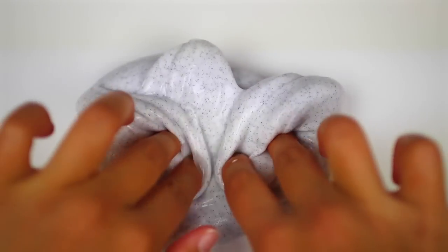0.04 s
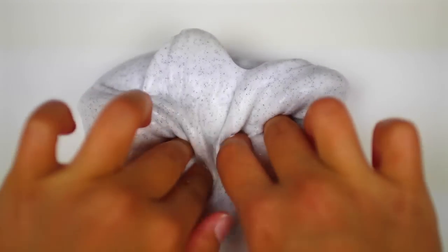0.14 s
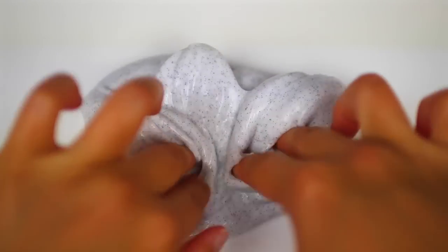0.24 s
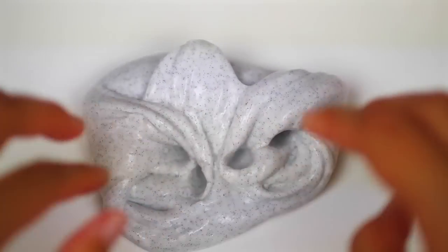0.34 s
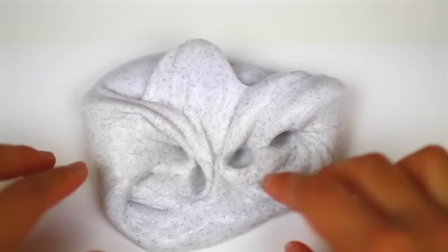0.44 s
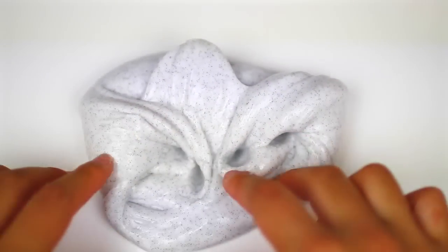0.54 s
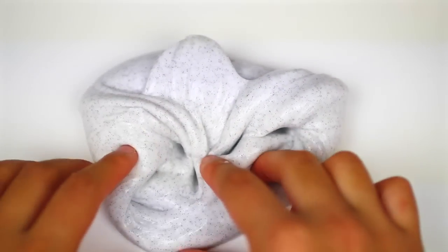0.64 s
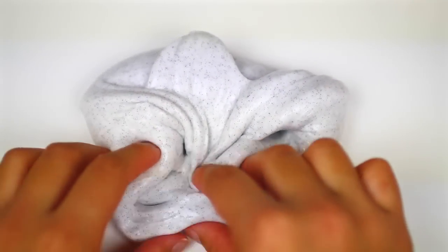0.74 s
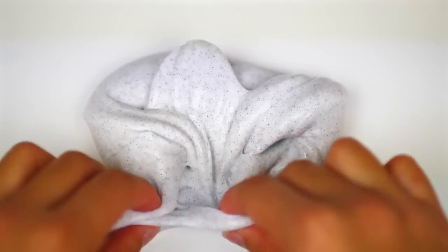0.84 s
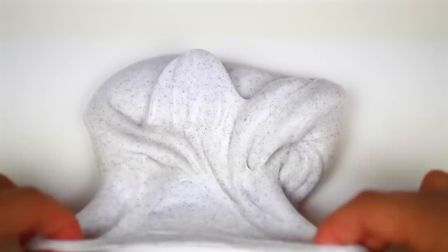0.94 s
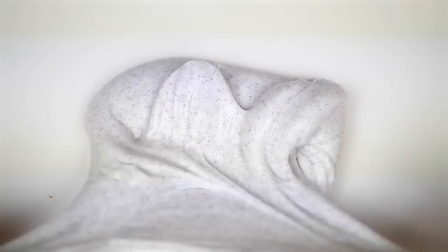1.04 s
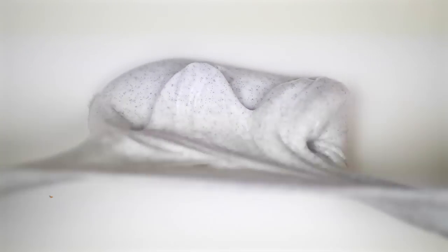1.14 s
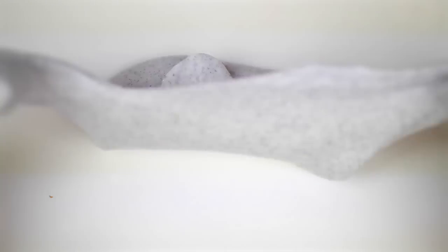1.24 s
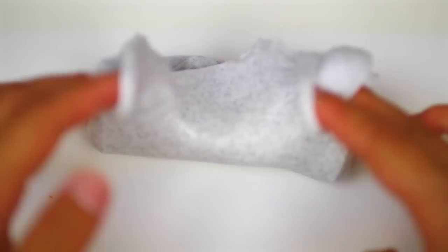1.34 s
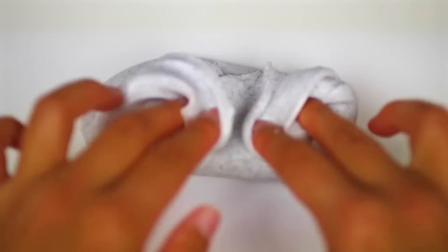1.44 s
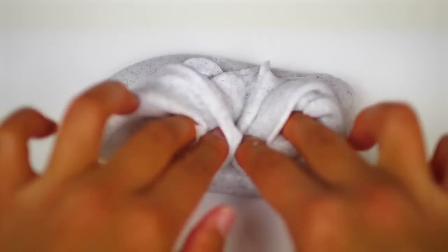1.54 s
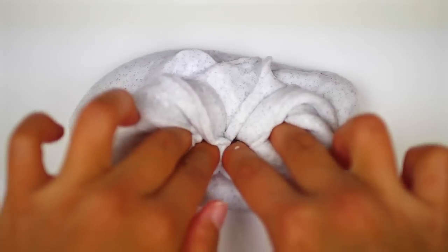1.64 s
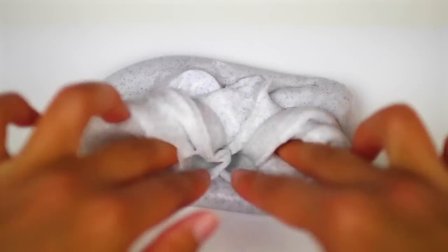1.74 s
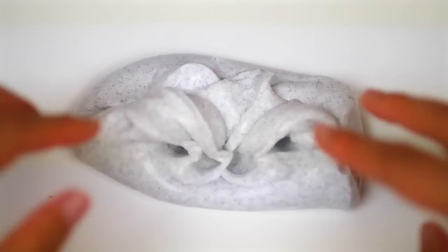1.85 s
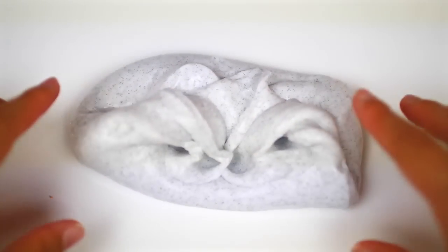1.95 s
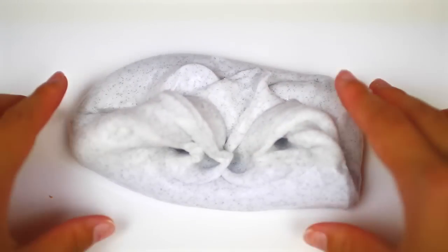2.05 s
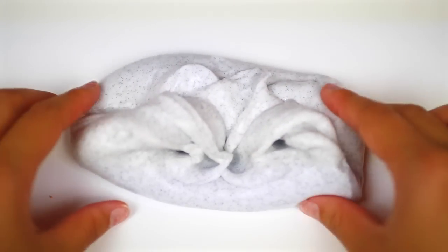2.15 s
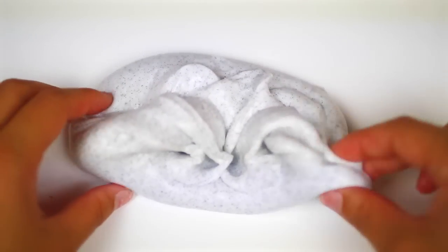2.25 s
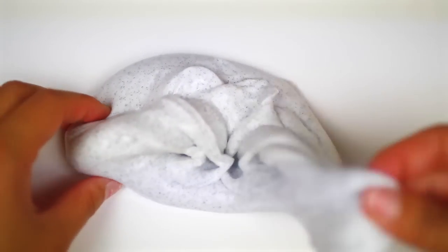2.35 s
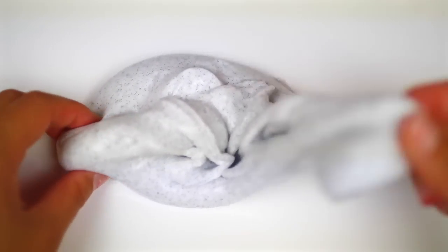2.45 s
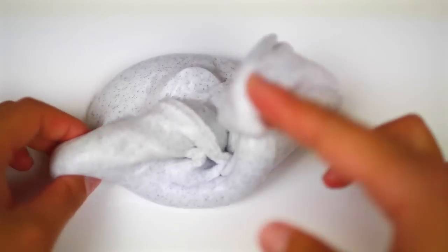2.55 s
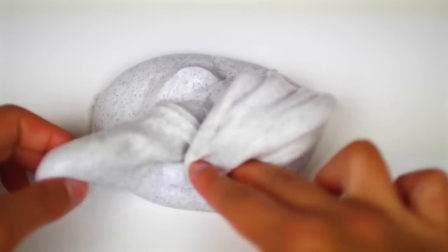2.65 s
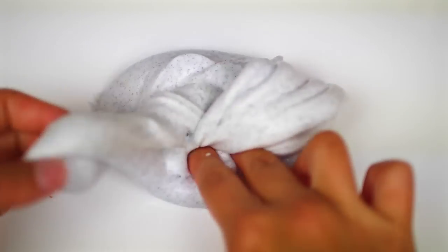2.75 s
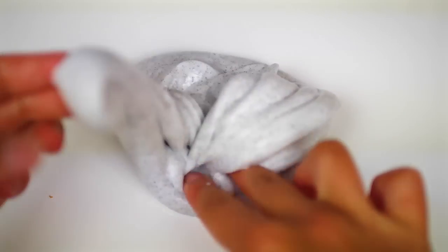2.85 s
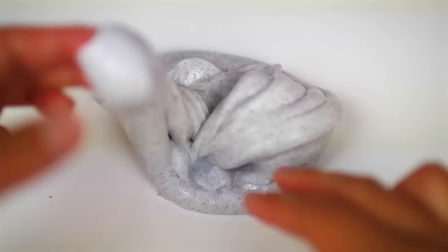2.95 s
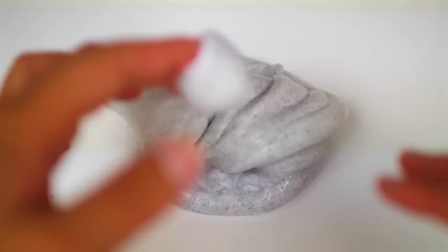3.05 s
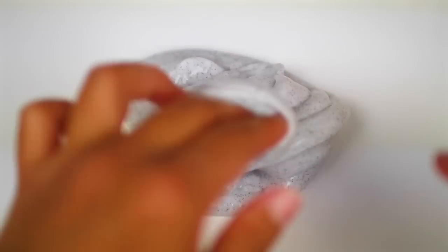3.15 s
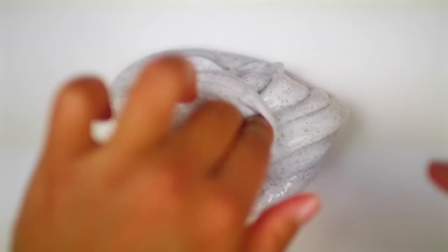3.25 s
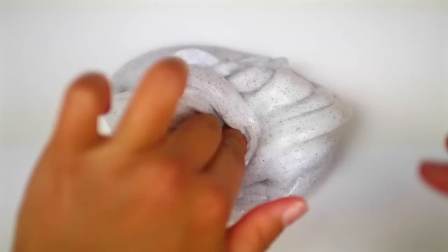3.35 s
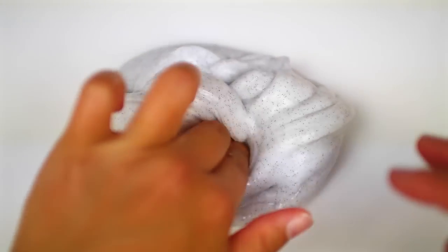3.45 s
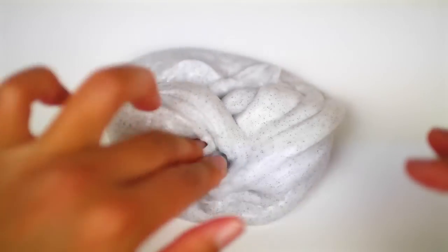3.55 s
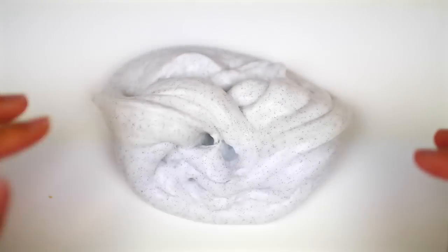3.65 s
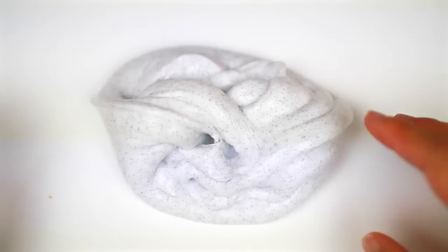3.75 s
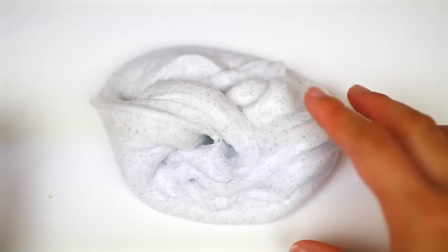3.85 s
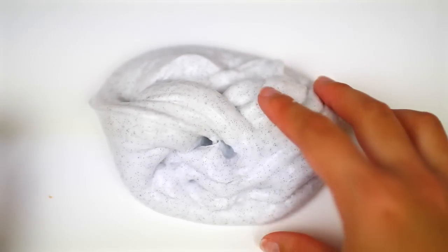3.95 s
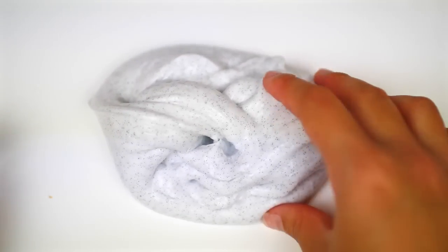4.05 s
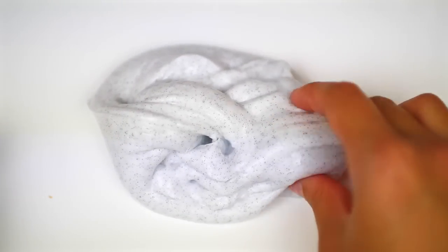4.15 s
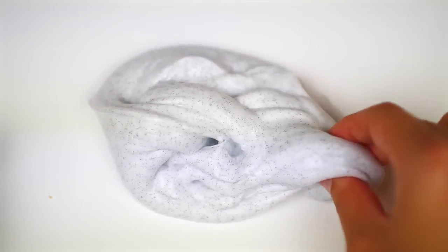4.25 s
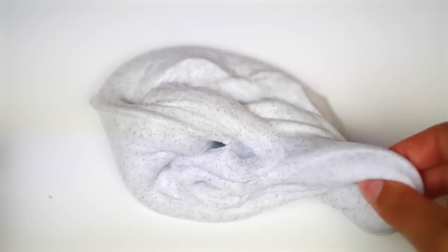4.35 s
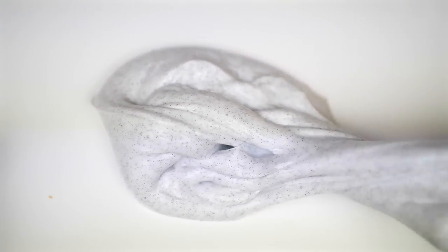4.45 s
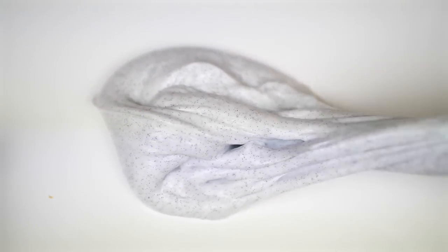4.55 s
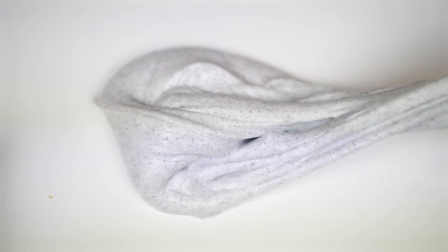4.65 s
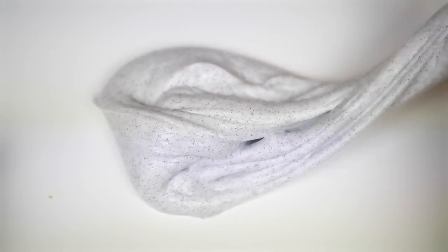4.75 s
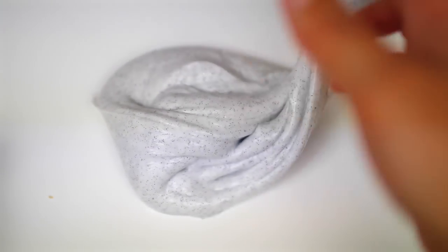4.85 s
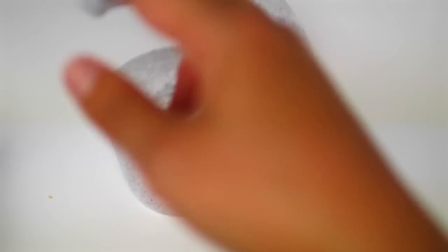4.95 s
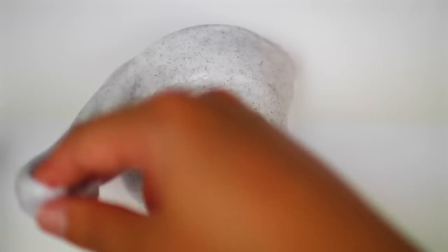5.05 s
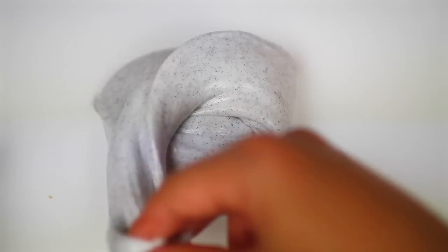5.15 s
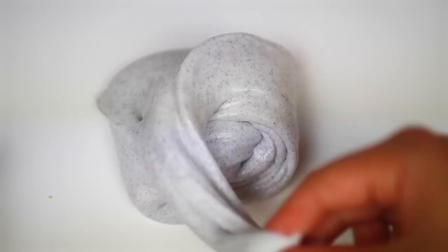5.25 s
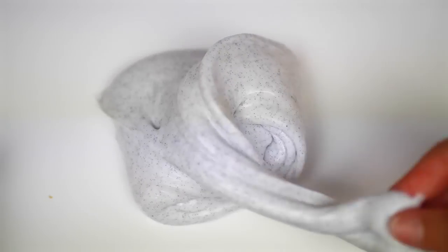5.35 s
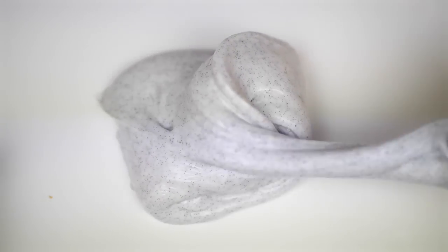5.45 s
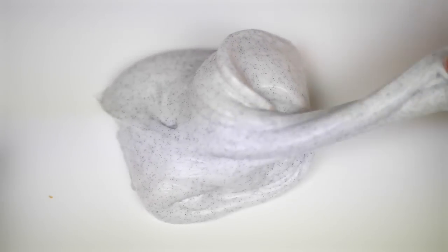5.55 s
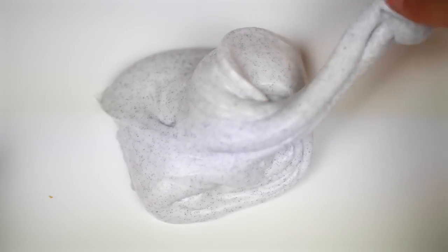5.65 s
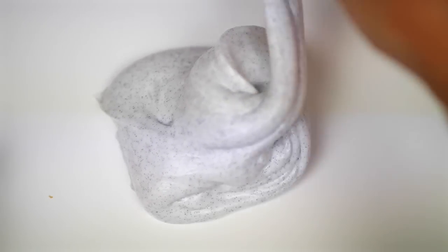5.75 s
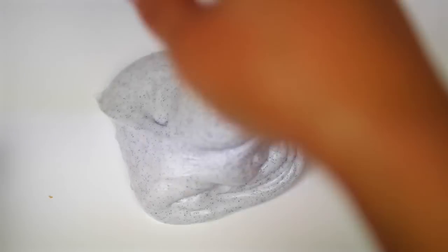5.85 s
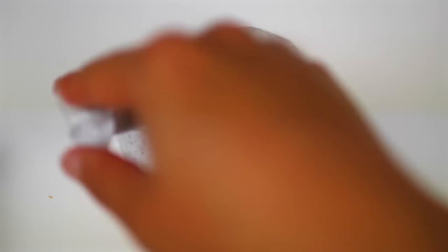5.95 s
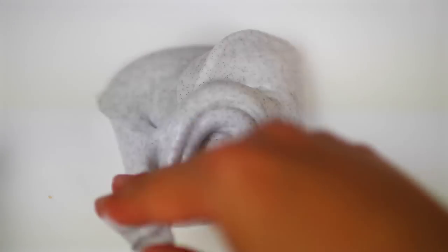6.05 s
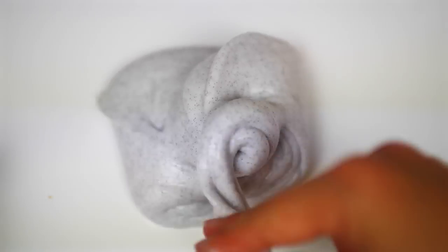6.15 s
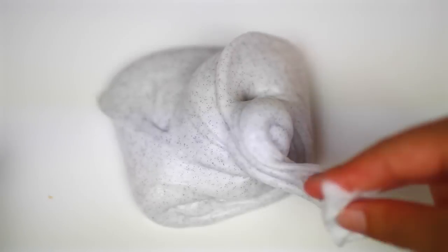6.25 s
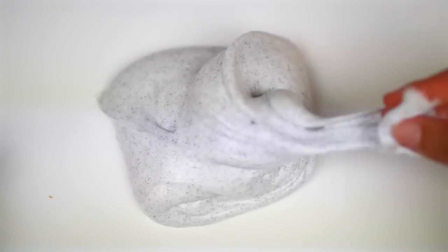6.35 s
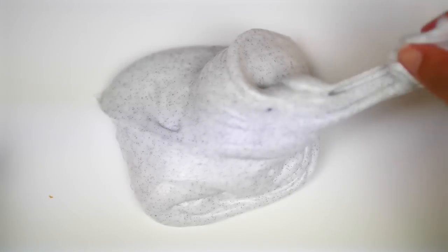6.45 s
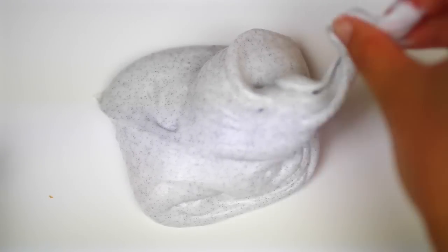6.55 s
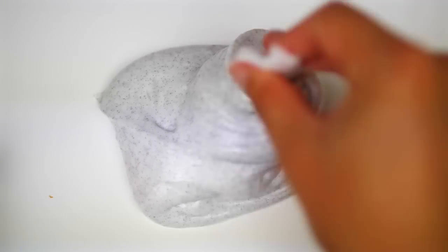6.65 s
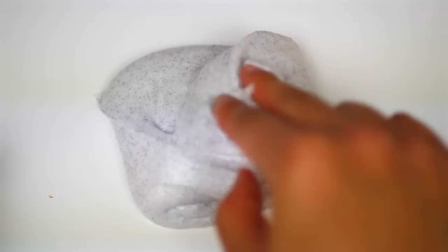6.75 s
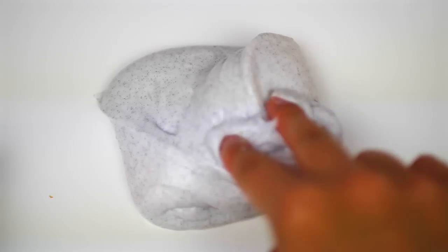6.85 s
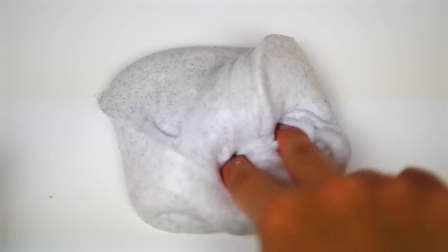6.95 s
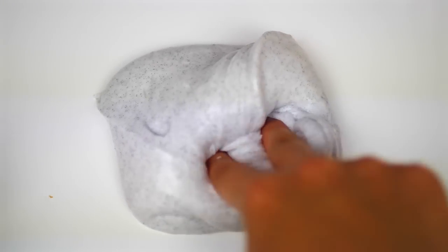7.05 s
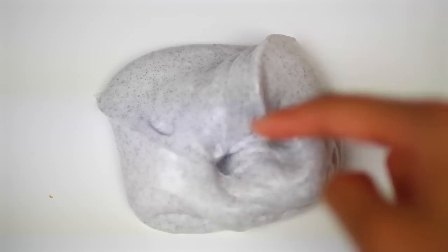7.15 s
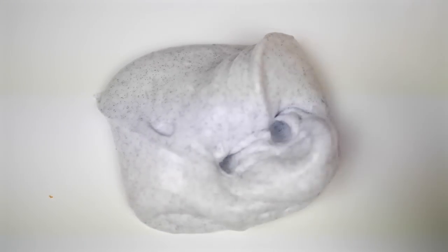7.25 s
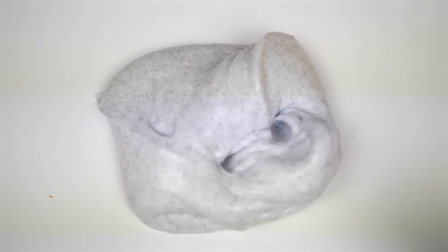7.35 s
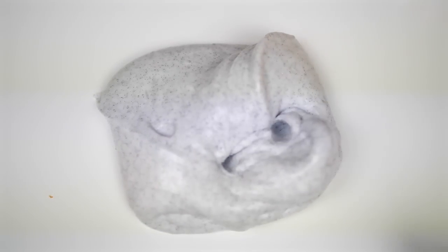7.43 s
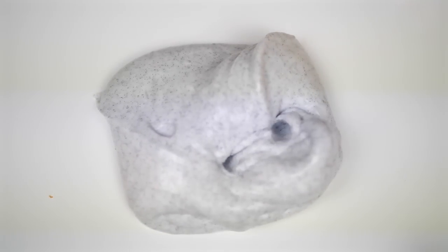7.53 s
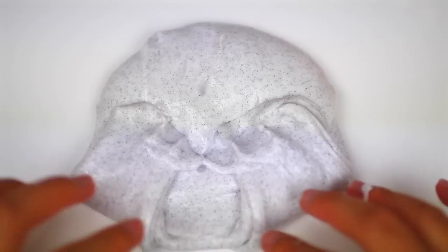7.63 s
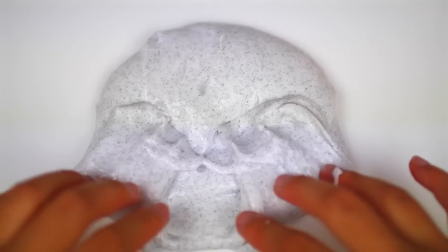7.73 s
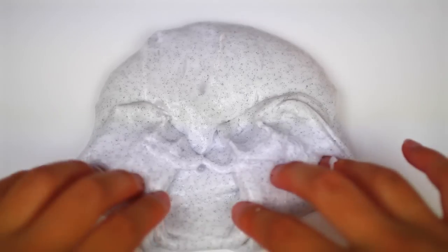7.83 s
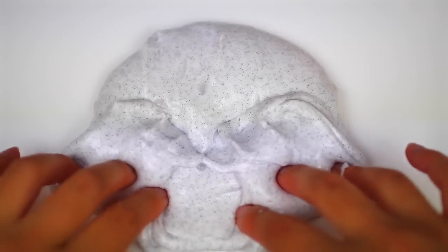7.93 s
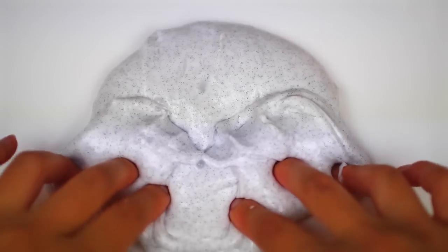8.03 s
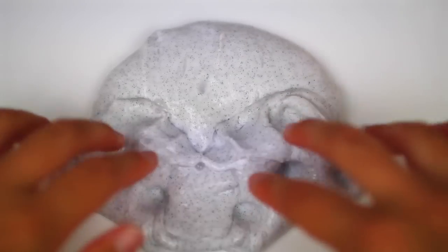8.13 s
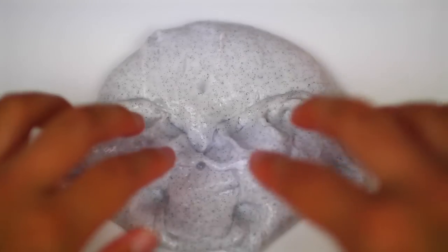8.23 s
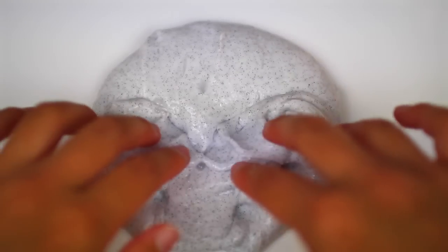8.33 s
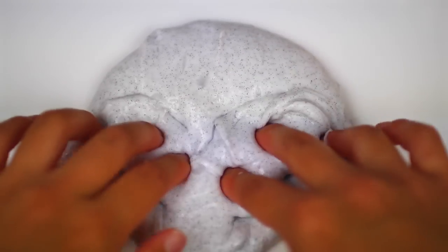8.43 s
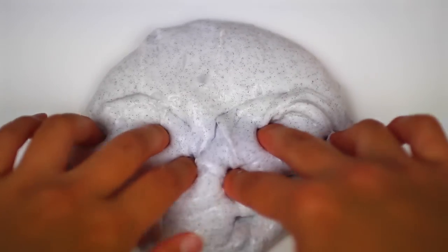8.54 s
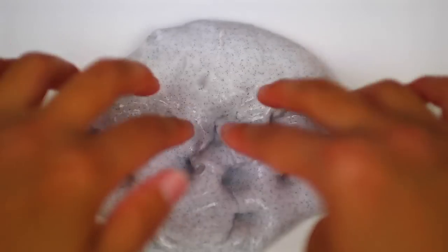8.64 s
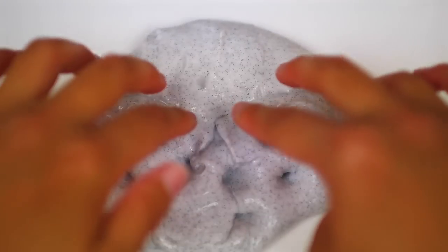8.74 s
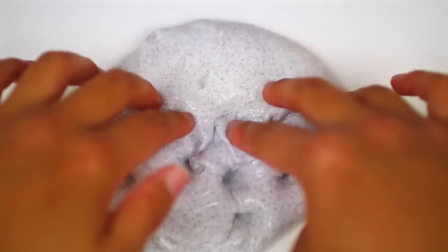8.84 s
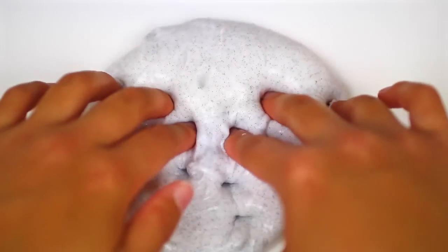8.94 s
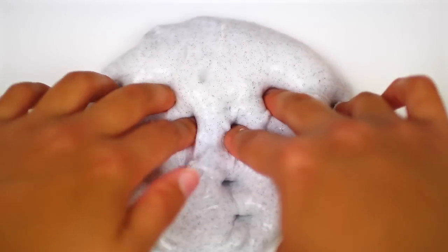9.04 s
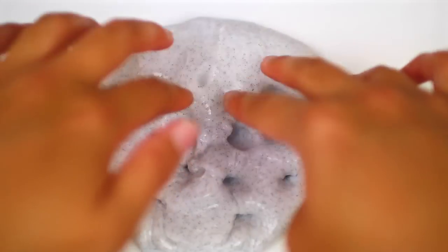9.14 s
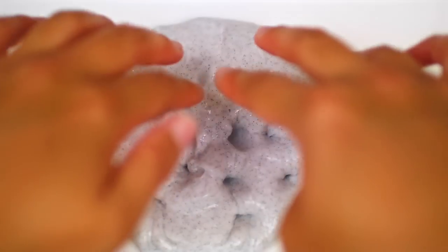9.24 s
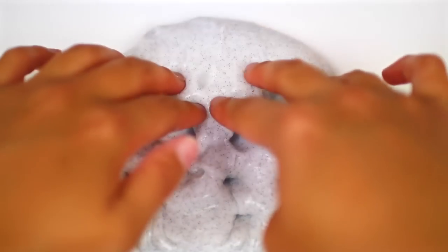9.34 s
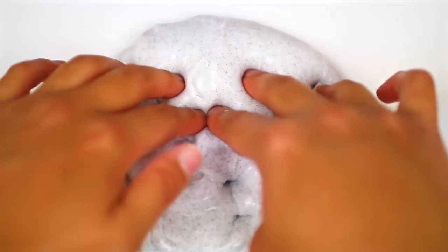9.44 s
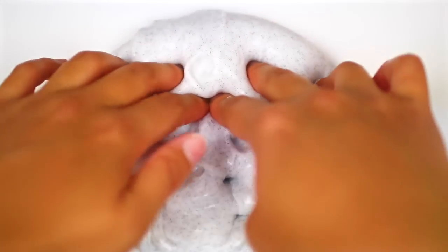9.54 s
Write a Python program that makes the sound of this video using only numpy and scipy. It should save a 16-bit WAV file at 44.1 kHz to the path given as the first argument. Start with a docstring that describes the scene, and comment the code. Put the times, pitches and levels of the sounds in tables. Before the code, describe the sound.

Sharp, dry clicking pops of trapped air tearing through slime skin, each a tight burst of two to four cracks with a hollow, bottle-like plop and a soft thud. Between them come sticky finger ticks, fine foam crackle and quiet stuttering motor chirps. Close mono microphone, small room with short reflections, gentle rumble, hiss and fan drone.

```python
"""In a small room, hands fold, stretch and press a lump of slime on a table, close to one microphone.
Trapped air bursts out in clusters: the skin tears in noisy slips and the opened pocket rings with a hollow plop.
Small impulses make the faint crackle and the ticks of slime leaving the fingers; damped sines make soft thuds.
A lens motor chirps as its steps brake, over rumble, hiss and a soft fan of filtered noise.
Resonances of the table top, near echoes and a diffuse field answer the sources."""
import sys
import numpy as np
from scipy import signal
from scipy.fft import rfft, irfft
from scipy.io import wavfile

SR = 44100
rng = np.random.default_rng(int(sys.argv[2]) if len(sys.argv) > 2 else 0)


def pcm_store(signal):
    """Save signal as 16-bit PCM."""
    levels = np.round(np.clip(np.atleast_2d(signal), -1, 1) * 32767)
    wavfile.write(sys.argv[1], SR, levels.astype(np.int16).T)


N = 422919  # samples

# air pockets bursting, levels before the common gains: t/s, crack level/dB, tear length/s,
# hole f/Hz, hole ring level/dB, pocket f/Hz, plop level/dB
BURSTS = [ (0.2992, -24, 0.0083, 5800, -14.5, 900, -44), (.304, -20, 0.0041, 3000, -6.5, 890, -40.5),
          (0.3268, 0.5, .0012, 2900, -2.5, 442, -9), (0.3306, 7, 0.00063, 7000, 1.5, 690, -12.5),
          (.355, -17, 0.0025, 4000, -21, 380, -21.5), (1.794, -8.5, 0.0015, 3600, -8.5, 1500, -31),
          (1.8343, -8.5, .002, 4400, -3.5, 1100, -32), (1.8394, 0.5, 0.0022, 4770, -2, 534, -5),
          (2.958, 1, 0.00032, 13500, -12, 900, -35), (2.9617, -10, 0.0004, 3300, -4.5, 650, -31),
          (2.97, -15, .0025, 3000, -16.5, 570, -13.5), (3.6196, -16, 0.002, 3300, -17.5, 1000, -21.5),
          (3.6376, -7, 0.0014, 2630, -13, 1090, -25), (3.6465, -14, 0.0011, 3750, -3.5, 440, -29.5),
          (7.1906, -4, 0.0018, 3460, -3.5, 533, -16), (7.2111, -19, 0.00053, 3410, -2, 382, -20),
          (8.1647, -1.5, 0.0014, 5000, -11.5, 1230, -27), (8.169, 2, 0.00071, 11500, -2, 675, -11.5),
          (8.184, 4, 0.00095, 1350, -2, 635, -3), (8.6568, 0.5, 0.0015, 2650, -12, 1070, -14),
          (8.6696, 1.5, 0.0012, 3500, -9, 675, -11.5), (8.681, -1, 0.0015, 1520, -12.5, 790, -13.5),
          (8.689, -8, 0.00051, 1530, -15, 980, -11), (9.166, 1, 0.00085, 2650, -13, 970, -10),
          (9.1748, -7, 0.0015, 3500, -11, 780, -9.5), (9.1847, -0.5, 0.0019, 3120, -11, 594, -8.5)]
# spectrum of cracking slime skin, relative: f/Hz, level/dB
CRACK_SPECTRUM = [(60, -18), (300, -8.5), (800, 1.5), (1700, -5.5), (3200, 2.5), (5000, -0.5), (8000, 2),
                  (12000, -2.5), (16000, -5.5)]
REST_DB = -75.5  # crackle of the lump settling between pulls, before the crackle gain


def from_db(db):
    """Level to amplitude: 20 dB is a factor of ten."""
    return 10 ** (np.asarray(db) / 20)


def rms_one(x):
    """Normalisation to unit effective value."""
    return x / np.sqrt(np.mean(x ** 2) + 1e-20)


def seconds(length):
    """Sampled time axis of the given length in seconds."""
    return np.arange(int(length * SR)) / SR


def at_hz(points, hz, axis=1):
    """Interpolation of one table column on a logarithmic frequency axis."""
    rows = np.array(points)
    return np.interp(np.log(np.maximum(hz, 1)), np.log(rows[:, 0]), rows[:, axis])


def add(out, s, sound):
    """Superposition: mixes a sound in from time s."""
    start = max(int(s * SR), 0)
    out[start:start + len(sound)] += sound[:max(N - start, 0)]


def colour(x, spectrum):
    """Minimum-phase filtering by the folded cepstrum: causal, with unit power gain."""
    size = 2 ** 13
    hz = np.arange(size // 2 + 1) * SR / size
    gain = rms_one(from_db(at_hz(spectrum, hz)))
    cepstrum = irfft(np.log(gain))
    cepstrum[1:size // 2] *= 2
    cepstrum[size // 2 + 1:] = 0
    impulse_response = irfft(np.exp(rfft(cepstrum)))
    return signal.fftconvolve(x, impulse_response)[:len(x)]


def resonate(x, hz, width_hz):
    """Damped oscillator: one pole pair whose radius sets the bandwidth, gain 1 at the peak."""
    r = np.exp(-np.pi * width_hz / SR)
    w = 2 * np.pi * min(hz, SR / 2 - 1) / SR
    return signal.lfilter(np.array([1, 0, -1]) * (1 - r * r) / 2, [1, -2 * r * np.cos(w), r * r], x)


def smooth(x, time_s):
    """First-order relaxation: a running average with the given time constant."""
    r = np.exp(-1 / (time_s * SR))
    return signal.lfilter([1 - r], [1, -r], x)


def rip(length, grain_db, snap):
    """Stick-slip: a first snap and a dying run of uneven slips, with the energy of a fading unit sine."""
    t = seconds(.04)
    slips = rng.standard_normal(len(t)) * from_db(grain_db * rng.standard_normal(len(t)))
    rise = 1 - np.exp(-4 * t / length)
    decay = np.exp(-t / length - (t / (3 * length)) ** 2)
    run = rms_one(slips) * decay * rise
    run[0] += snap
    return rms_one(run) * np.sqrt(np.mean(np.exp(-2 * t / length)) / 2)


def hole_ring(burst, hz, sharpness):
    """Resonance of a small opening: the burst excites its pitch, at the burst's own energy."""
    return rms_one(resonate(burst, hz, hz / sharpness)) * np.std(burst)


def tears(crack_db=-2.5, ring_db=-4.0):
    """Brittle failure of a membrane: the skin cracks and its hole rings."""
    lead_s, lead_db = .004, -27.5  # faint noise before the crack: length, level
    cracks, rings = np.zeros(N), np.zeros(N)
    for s, level_db, length, hz, whistle_db, _, _ in BURSTS:
        burst = rip(length, grain_db=3.5, snap=1.2)
        add(cracks, s, from_db(level_db) * burst)
        lead = rip(lead_s, grain_db=3.5, snap=0) * np.sqrt(length / lead_s)
        add(cracks, s - 2 * lead_s, from_db(level_db + lead_db) * lead)
        add(rings, s, from_db(whistle_db) * hole_ring(burst, hz, sharpness=6.5))
    return from_db(crack_db) * colour(cracks, CRACK_SPECTRUM) + from_db(ring_db) * rings


def pockets(bend=0.13, settle_s=0.0017, open_s=0.0004, puff_db=-30.5, puff_s=0.0039,
            flap_db=-4.5, flap_s=0.0036, flap_ratio=1.206):
    """Cavity resonance: the opened pocket rings like a tiny bottle, its pitch settling as air puffs out."""
    cycles_to_60_db = 10  # cycles of ringing until 60 dB down
    lag = 1.2  # opening delay in tear lengths
    out, t = np.zeros(N), seconds(.15)
    for torn_s, _, length, _, _, hz, level_db in BURSTS:
        s = torn_s + lag * length
        t60 = cycles_to_60_db / hz
        pitch = hz * (1 + bend * np.exp(-t / settle_s))
        ring = np.sin(2 * np.pi * np.cumsum(pitch) / SR) * from_db(-60 * t / t60)
        puff = from_db(puff_db) * np.exp(-t / puff_s)
        add(out, s, from_db(level_db) * (ring + puff) * (1 - np.exp(-t / open_s)))
        # the rim flaps unevenly, which roughens the plop and widens its spectrum
        flap_hz = hz * flap_ratio
        flap = hole_ring(rip(flap_s, grain_db=3.5, snap=0), flap_hz, sharpness=0.31)
        add(out, s, from_db(level_db + flap_db) * hole_ring(flap, flap_hz, sharpness=0.98))
    return signal.sosfilt(signal.butter(2, 40, "high", fs=SR, output="sos"), out)


def thuds(fade_s=0.0065):
    """Heavily damped impact: the emptied lump drops onto the table as a short decaying sine."""
    # lump slumping after a burst: t/s, level/dB, f/Hz
    thud_table = [(0.332, -28.5, 130.4), (1.844, -30, 219), (2.968, -38, 167), (3.646, -33.5, 200),
                  (7.194, -27.5, 131.6), (8.187, -32.5, 143), (8.682, -32.5, 150), (9.185, -30.5, 172.5)]
    out, t = np.zeros(N), seconds(.08)
    for s, level_db, hz in thud_table:
        add(out, s, from_db(level_db) * np.sin(2 * np.pi * hz * t) * np.exp(-t / fade_s))
    return signal.sosfilt(signal.butter(2, 45, "high", fs=SR, output="sos"), out)


def pull():
    """Exponential loading and relaxation: strain on the slime as crackle amplitude, summed in power."""
    # pulls and presses of the hands, level before the crackle gain: t of the height/s, level/dB,
    # swell/s, release/s (each the time for a tenfold change of amplitude)
    pull_table = [(.298, -37.5, .014, .05), (0.901, -58.5, 0.12, .25), (1.059, -50.5, .16, .07),
                  (1.29, -59.5, .25, .2), (2.391, -55, 0.14, .18), (2.78, -63.5, .3, .2),
                  (2.915, -46.5, .02, .1), (2.95, -37, 0.018, .04), (3.609, -51, .08, .08),
                  (4.57, -59, .16, 0.39), (5.94, -63, .2, .1), (6.761, -50, .055, .05),
                  (7.17, -49, 0.047, 0.17), (7.5, -63, 0.56, .3)]
    t = np.arange(N) / SR
    power = from_db(REST_DB) ** 2
    for s, level_db, swell, release in pull_table:
        decades_down = np.minimum(np.maximum((s - t) / swell, (t - s) / release), 10)
        power = power + (from_db(level_db) * 10 ** -decades_down) ** 2
    return np.sqrt(power)


def crackle(per_s=1500, spread_db=2.0, level_db=-0.5, cell_db=1.5, clump_db=3.5, clumps_per_s=90):
    """Random impulse process: foam cells break in clumps of clicks, each with a brief pitch of its own."""
    # spectrum of breaking foam, relative: f/Hz, level/dB
    crackle_spectrum = [(200, -10.5), (700, -0.5), (2200, -3), (3600, -0.5), (6000, -7.5), (10000, -3.5),
                        (16000, -4)]
    t, knots = np.arange(N) / SR, rng.standard_normal(4000)
    clumps = clump_db * np.interp(t * clumps_per_s, np.arange(len(knots)), knots)
    spread = spread_db * np.minimum(rng.exponential(1, N), 3)
    sizes = from_db(clumps + spread) * rng.choice([-1, 1], N)
    cells = sizes * (rng.random(N) < per_s / SR)
    pitches = np.geomspace(1400, 7000, 12)
    dealt = rng.integers(len(pitches), size=N)  # which pitch each cell gets
    # the tiny offset keeps the filters off denormal numbers
    rings = sum(resonate(cells * (dealt == k) + 1e-18, hz, hz / 6) for k, hz in enumerate(pitches))
    grains = rms_one(cells) + from_db(cell_db) * rms_one(rings)
    return from_db(level_db) * pull() * rms_one(colour(grains, crackle_spectrum))


def stray_ticks(count=36, spread_db=4.5, spread_octaves=.8, pull_exponent=1):
    """Inverse-distribution sampling: rows of faint ticks at random moments, drawn towards the pulls."""
    centre_db, centre_hz, ring_db = -42.5, 2751, -5
    chance = np.cumsum(np.maximum(pull() - from_db(REST_DB), 0) ** pull_exponent)
    times = np.searchsorted(chance / chance[-1], rng.random(count)) / SR
    draws = rng.uniform(-0.8, 1, (count, 2))
    return [(s, centre_db + spread_db * size, centre_hz * 2 ** (spread_octaves * pitch), ring_db)
            for s, (size, pitch) in zip(times, draws)]


def ticks(crack_db=-6.0, delay_s=0.0014):
    """Adhesive release: tiny surface bubbles snap as the fingers lift, and their holes ring."""
    # slime letting go of the skin, times before the common delay, levels before the crack gain:
    # t/s, level/dB, f/Hz, ring level re the burst/dB
    tick_table = [(.1363, -48, 1720, 11.5), (.1805, -29, 4150, -5.5), (.8962, -25.5, 3500, -22),
                  (.9492, -35.5, 9730, 1), (1.0602, -26, 2053, -3), (2.389, -27, 3560, 1.5),
                  (2.4418, -39, 2100, 1), (2.7615, -30.5, 3024, -13), (2.834, -25.5, 3270, -15.5),
                  (3.4489, -20.5, 3435, -21), (4.5461, -30, 3687, -10), (4.775, -40, 2410, -5),
                  (4.9217, -37.5, 1740, -1.5), (5.3056, -29, 7820, -8.5), (7.0299, -30.5, 11800, -7),
                  (7.1478, -29.5, 3352, -8.5), (7.9277, -24.5, 5800, -9), (8.4595, -13.5, 1270, -16),
                  (8.4898, -8.5, 11550, 3.5), (8.4941, -10, 1403, -14.5), (8.546, -13.5, 11740, -9),
                  (8.979, -15.5, 9930, -5), (9.0077, -19, 9700, -16), (9.504, -26.5, 5730, -16),
                  (9.56, -34, 8100, -6)]
    cracks, rings = np.zeros(N), np.zeros(N)
    for s, level_db, hz, ring_db in list(tick_table) + stray_ticks():
        burst = rip(length=.0003, grain_db=3.0, snap=8.0)
        add(cracks, s + delay_s, from_db(level_db) * burst)
        add(rings, s + delay_s, from_db(level_db + ring_db) * hole_ring(burst, hz, sharpness=4.8))
    return from_db(crack_db) * colour(cracks, CRACK_SPECTRUM) + rings


def focus_motor(start_hz=1380, end_hz=320, brake_s=0.0085, fade_s=0.017,
                gear_hz=3600, gear_db=-13.5, gear_s=0.0035,
                bounce_s=0.0046, bounce_db=-3.0, rattle_db=3.5,
                hum_db=-10.0, hum_s=0.015, level_db=-6.5, speed_spread=0.045):
    """Braked rotation: each step is a falling chirp with gear tick and hum, rattling in the housing."""
    # lens refocusing in runs of steps, level before the part gains: t/s, number of steps, level/dB
    run_table = [(.834, 4, -47.5), (1.034, 8, -48), (1.675, 1, -42.5), (3.271, 3, -49), (4.139, 1, -54),
                 (5.526, 1, -46), (5.607, 5, -47.5), (5.842, 6, -45), (6.174, 1, -45), (6.275, 1, -46),
                 (6.461, 1, -47), (6.542, 5, -49), (6.775, 4, -49)]
    steps_per_s, jitter_s = 30, .002
    out, t = np.zeros(N), seconds(.12)
    pitch = end_hz + (start_hz - end_hz) * np.exp(-(t / brake_s) ** 2)
    envelope = (1 - np.exp(-t / .001)) * np.exp(-t / fade_s)
    chirp = np.sin(2 * np.pi * np.cumsum(pitch) / SR) * envelope
    hum = from_db(hum_db) * np.sin(2 * np.pi * end_hz * t) * np.exp(-t / hum_s)
    steps = [(s + k / steps_per_s + rng.normal(0, jitter_s), run_db)
             for s, count, run_db in run_table for k in range(round(count))]
    for s, step_db in steps:
        gear_noise = rms_one(resonate(rng.standard_normal(len(t)), gear_hz, 270))
        gear = from_db(gear_db) * gear_noise * np.exp(-t / gear_s)
        add(out, s, from_db(step_db) * (hum + gear))
        speed = 1 + speed_spread * rng.uniform(-1.3, 1)  # steps run unequally fast
        step = np.interp(t * speed, t, chirp)
        for bounce in range(5):
            strength_db = step_db + level_db + bounce * bounce_db + rattle_db * rng.standard_normal()
            bounce_at = s + bounce * bounce_s + rng.normal(0, .0006)
            add(out, bounce_at, from_db(strength_db) * step)
    return out


def table_top(x):
    """Modal response: the table top rings along as a sum of plate resonances."""
    # modes of the table top: f/Hz, width/Hz, level/dB
    mode_table = [(112, 15, -8.5), (207, 8.4, -1), (363, 10, 4), (437, 8, -5), (677, 55, -4.5),
                  (803, 15, -8.5), (980, 75, -15)]
    return sum(from_db(level_db) * resonate(x, hz, width_hz) for hz, width_hz, level_db in mode_table)


def standing_waves(ripple_db, spacing_hz):
    """Modal interference: two unrelated noises share the steady peaks and dips that the walls impose."""
    hz = np.arange(N // 2 + 1) * SR / N
    knots = rng.standard_normal(4000)
    gain = from_db(ripple_db * np.interp(hz / spacing_hz, np.arange(len(knots)), knots))
    return irfft(rfft(rng.standard_normal((2, N))) * gain, N)


def room(x, build_s=0.004):
    """Energy balance of a diffuse field: each band stores and loses energy at its own rate; echoes join."""
    # diffuse tail: f/Hz, level re the sound fed in/dB, t60/s
    tail_table = [(60, -1.5, 0.23), (150, -2.5, 0.26), (270, -5.5, .3), (390, -1, 0.21), (706, -7.5, 0.34),
                  (1360, -8.5, 0.36), (2100, -13, 0.36), (3500, -13, 0.45), (4670, -13, 0.34),
                  (7000, -15, 0.43), (10000, -19.5, 0.34), (16210, -19.5, 0.41)]
    # echoes from table, hands and camera: delay t/s, level/dB
    echo_table = [(.0011, -25.5), (.0027, -19), (.0046, -17.5)]
    out, field = np.zeros(N), standing_waves(ripple_db=4.0, spacing_hz=34.8)
    edges = np.geomspace(35, 18000, 34)
    for k, (low, high) in enumerate(zip(edges, edges[1:])):
        hz = np.sqrt(low * high)
        band = signal.butter(2, [low, high], "band", fs=SR, output="sos")
        fed = smooth(signal.sosfilt(band, x) ** 2, build_s)
        t60 = at_hz(tail_table, hz, axis=2)
        stored = smooth(fed, t60 / np.log(10 ** 6))
        carrier = rms_one(signal.sosfilt(band, field[k % 2]))  # neighbouring bands are unrelated
        out += from_db(at_hz(tail_table, hz)) * np.sqrt(stored) * carrier
    for delay, level_db in echo_table:
        add(out, delay, from_db(level_db) * x)
    return out


def background():
    """Stationary noise: room rumble and microphone hiss by spectrum, a fan's drone by narrow resonance."""
    # spectrum of rumble and hiss, relative: f/Hz, level/dB
    air_spectrum = [(25, -31.5), (40, -16), (56, 0), (75, -6), (110, -5.5), (200, -7), (330, -12.5),
                    (430, -15.5), (800, -18), (1500, -26), (2100, -23.5), (3600, -27.5), (6000, -28),
                    (16000, -29)]
    air_db, fan_db = -63, -69.5  # effective levels
    fan_hz, fan_width_hz = 296, 35
    air = from_db(air_db) * rms_one(colour(rng.standard_normal(N), air_spectrum))
    narrow = resonate(rng.standard_normal(N), fan_hz, fan_width_hz)
    drone = resonate(narrow, fan_hz, 2 * fan_width_hz)
    return air + from_db(fan_db) * rms_one(drone)


def scene(tick_room_db=0.0, motor_room_db=-3.5):
    """Superposition at one microphone: direct sound, table and room, the same in both channels."""
    slime = tears() + pockets() + thuds() + crackle()
    snaps, motor = ticks(), focus_motor()
    echo = room(slime + from_db(tick_room_db) * snaps + from_db(motor_room_db) * motor)
    return np.tile(slime + table_top(slime) + snaps + motor + echo + background(), (2, 1))


def record(dry):
    """Overload and band limiting: peaks clip at full scale, then the top is cut above 16 kHz."""
    low_pass = signal.ellip(10, .1, 80, 16000, fs=SR, output="sos")
    return signal.sosfilt(low_pass, np.clip(dry, -1, 1))


dry = scene()
out = record(dry)
pcm_store(out)
```